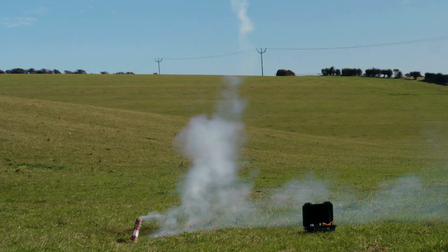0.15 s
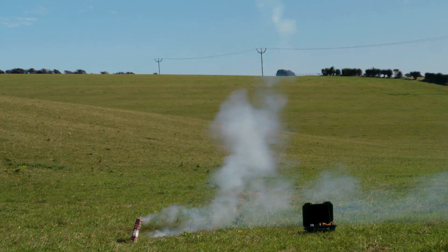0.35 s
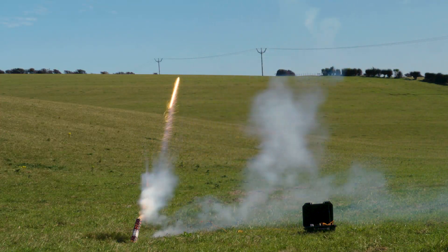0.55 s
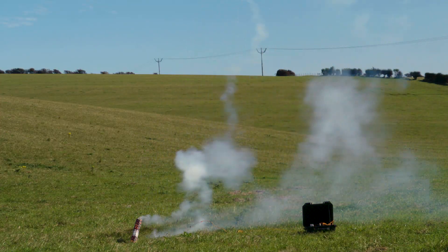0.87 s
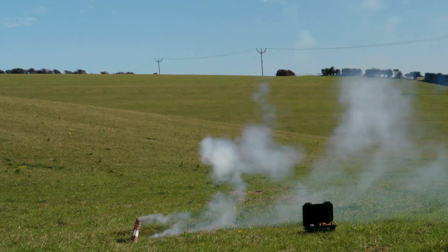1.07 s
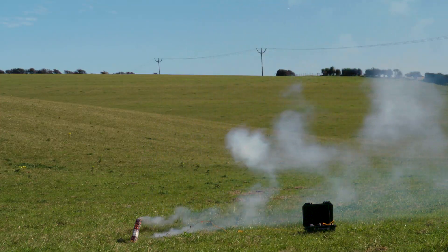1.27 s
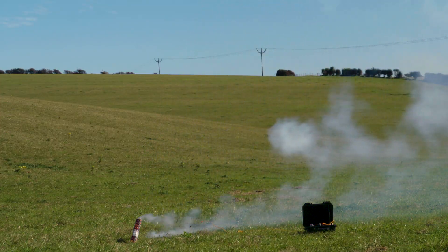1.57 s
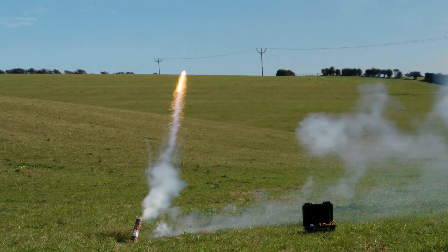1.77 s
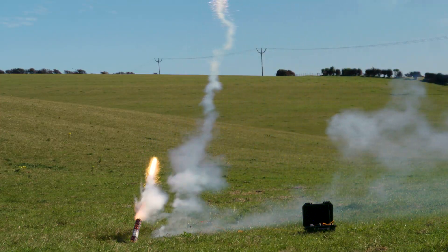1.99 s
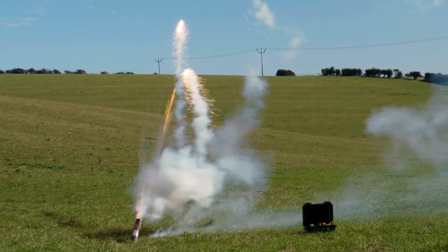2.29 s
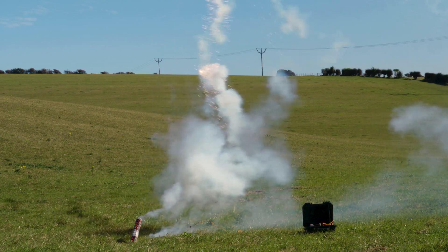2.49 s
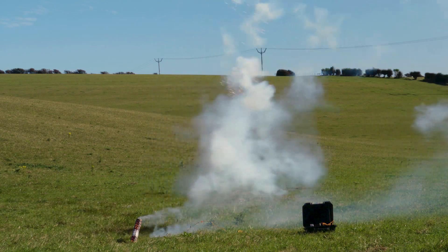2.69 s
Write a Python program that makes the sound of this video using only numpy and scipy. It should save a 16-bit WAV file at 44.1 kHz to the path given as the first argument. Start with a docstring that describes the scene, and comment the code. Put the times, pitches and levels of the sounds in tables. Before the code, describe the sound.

Firework tube fires five sharp cracking shots at uneven intervals in a windy open field

```python
"""Low puffs and rumble of wind on a microphone in an open field, over a faint hiss and murmur;
a dying sizzle opens the scene, then a firework tube fires five shots. Each is a crack and a thump
with a ground echo, a short sizzle, and two later washes of hiss thrown back from far off.
Cracks are pressure spikes and crackling noise, thumps are ringing tube modes,
puffs are short swung cosines; sizzle, washes, rumble and floor are shaped noise."""
import sys
import numpy as np
from scipy import signal
from scipy.fft import rfft, irfft
from scipy.io import wavfile

SR = 44100
rng = np.random.default_rng(int(sys.argv[2]) if len(sys.argv) > 2 else 0)


def volts(x):
    """Linear amplitude factor 10**(x/20) for a level x in dB, scalar or array-like."""
    e = np.asarray(x, float) / 20
    return 10 ** e


def wav_record(signal):
    """Record a signal, one row per channel, as 16-bit PCM in the file named by sys.argv[1]."""
    frames = np.transpose(np.atleast_2d(signal))
    bounded = np.clip(frames, -1, 1)
    # unit amplitude maps onto the largest positive 16-bit level
    quanta = np.round(bounded * 32767).astype(np.int16)
    wavfile.write(sys.argv[1], SR, quanta)


N = 125685
TIME = np.arange(N) / SR

# shots of the tube: (time [s], sizzle level [dB], sizzle t60 [s], sizzle treble boost [dB],
# near wash level [dB], far wash level [dB], jet pitch [Hz], ground echo level [dB], gas leak time [s])
SHOTS = [(-.03, -34, 0.32, 8, -36.5, -46.5, 4870, -14, .006),
         (0.5947, -23, 0.091, 3.5, -43.5, -50.5, 4600, -8, 0.0093),
         (1.7774, -21, 0.093, 2, -47, -46.5, 8600, -5, 0.015),
         (2.0238, -33, 0.15, -21, -60, -46, 8300, -4.5, 0.0066),
         (2.2017, -23, 0.063, 5.5, -50.5, -57, 7860, -7, 0.014),
         (2.361, -21, 0.088, 3.5, -37, -49, 6900, -4.5, 0.013)]
RISE_S = 0.0004  # onset of sizzle and crackle
TREBLE_HZ, TREBLE_T60_SHARE = 5500, 0.72  # the treble dies sooner


def rms_one(x):
    """Scale to rms 1."""
    return x / np.sqrt(np.mean(x ** 2) + 1e-20)


def cut(x, hz, kind, order):
    """Butterworth high- or low-pass."""
    return signal.sosfilt(signal.butter(order, hz, kind, fs=SR, output="sos"), x)


def coloured(spectrum):
    """Noise with the given spectrum, interpolated over log frequency; rms 1."""
    hz, level_db = np.transpose(spectrum)
    bin_hz = np.maximum(np.arange(N // 2 + 1) * SR / N, 1)
    gain = volts(np.interp(np.log(bin_hz), np.log(hz), level_db))
    return rms_one(irfft(rfft(rng.standard_normal(N)) * gain, N))


def halves(spectrum):
    """Coloured noise split into body and treble."""
    noise = coloured(spectrum)
    body = cut(noise, TREBLE_HZ, "low", order=2)
    treble = -cut(noise, TREBLE_HZ, "high", order=2)  # the sign keeps the crossover from cancelling
    return body, treble


def drift(rate):
    """Slow random wander below about the given rate in Hz; rms 1."""
    r = np.exp(-2 * np.pi * rate / SR)
    settling = 4000  # samples dropped while the filter settles
    wander = signal.lfilter([1], [1, -2 * r, r * r], rng.standard_normal(N + settling))
    return rms_one(wander[settling:])


def ring(x, hz, t60):
    """A damped resonator: a unit click sets a sine of about height 1 ringing."""
    r, w = volts(-60 / (t60 * SR)), 2 * np.pi * hz / SR
    return signal.lfilter([0, np.sin(w)], [1, -2 * r * np.cos(w), r * r], x + 1e-18)


def swell(start, rise, hold, t60):
    """Envelope that rises in a line, holds, then dies away exponentially."""
    t = TIME - start
    fall_db = -60 * np.maximum(t - rise - hold, 0) / t60
    return np.clip(t / rise, 0, 1) * volts(fall_db)


def ground(x):
    """The ground repeats each shot after a short delay, with a strength of its own."""
    delay_s = 0.0105
    starts = [shot[0] - shot[8] for shot in SHOTS]  # from the start of each gas leak
    strengths = volts([shot[7] for shot in SHOTS])
    strength = strengths[np.searchsorted(starts, TIME) - 1]
    return np.roll(x * strength, int(delay_s * SR))


def jet(level, s):
    """The jet of gas favours one band: noise around the jet pitch of the shot nearest to time s."""
    t60_s = 0.0025  # damping of the two resonators in series, the first twice as fast
    hz = min(SHOTS, key=lambda shot: abs(shot[0] - s))[6]
    noise = ring(rng.standard_normal(N), hz, t60_s / 2)
    return level * rms_one(ring(noise, hz, t60_s))


def background():
    """Steady coloured noise: a faint hiss and a low far-off murmur."""
    # spectrum of the hiss: (frequency [Hz], relative level [dB per Hz])
    hiss_spectrum = [(760, -34), (1300, -3), (1730, 7.5), (2000, 5.5), (2490, 1.5), (4220, -5.5), (4630, 4),
                     (5600, -13.5), (6550, -2), (8000, -5.5), (16000, -41)]
    # spectrum of the low far-off noise: (frequency [Hz], relative level [dB per Hz])
    murmur_spectrum = [(20, 4), (100, 1), (400, -24), (760, -8), (1300, -18), (2500, -54)]
    hiss_db, murmur_db = -62, -55
    return volts(hiss_db) * coloured(hiss_spectrum) + volts(murmur_db) * coloured(murmur_spectrum)


def wind():
    """Lumpy rumble on the gust curve, and single puffs that swing a cycle or two, with a sharper edge."""
    # rumble of the wind as it gusts: (time [s], level [dB])
    gusts = [(0, -55.5), (0.12, -46), (0.25, -48.5), (0.33, -45), (0.42, -39.5), (0.5, -67.5),
             (0.55, -27.5), (0.64, -39.5), (0.76, -37), (0.8, -42), (0.83, -30.5), (0.95, -36.5),
             (1.04, -56), (1.08, -25), (1.14, -33), (1.3, -32), (1.38, -43.5), (1.5, -34), (1.56, -19),
             (1.67, -40), (1.74, -62.5), (1.76, -32), (1.84, -38.5), (1.87, -21.5), (1.96, -32.5),
             (2.05, -33), (2.13, -37.5), (2.17, -28.5), (2.27, -31.5), (2.33, -40.5), (2.42, -47),
             (2.5, -40), (2.57, -57.5), (2.66, -65.5), (2.742, -56), (2.755, -27), (2.85, -28)]
    # spectrum of the rumble: (frequency [Hz], relative level [dB per Hz])
    rumble_spectrum = [(12, -54), (40, -12), (120, 1), (240, 2.5), (400, -9), (600, -18.5), (900, -38.5),
                       (2000, -79)]
    # puffs on the microphone: (time [s], peak of envelope [dB], pitch [Hz], edge level [dB])
    puffs = [(0.257, -25.5, 183, -50), (0.323, -18.5, 259, -38), (0.356, -25, 165, -26),
             (0.568, -14.5, 324, -24), (0.584, -12.5, 242, -19), (0.671, -14, 354, -19),
             (0.678, -16, 238, -46), (0.752, -18, 231, -24), (0.822, -12, 292, -26),
             (0.847, -20, 300, -23.5), (0.909, -4.5, 265, -27), (0.999, -21.5, 210, -33),
             (1.08, -18, 303, -40), (1.096, -13.5, 369, -34), (1.117, -13.5, 250, -57),
             (1.155, -15, 258, -33), (1.225, -18.5, 310, -28), (1.247, -12, 232, -27),
             (1.266, -20, 280, -23.5), (1.524, -18.5, 318, -13.5), (1.534, -12, 244, -36),
             (1.551, -12, 235, -44), (1.56, -18.5, 247, -11), (1.59, -25, 253, -22),
             (1.658, -21.5, 244, -37), (1.866, -10.5, 308, -19), (1.886, -21, 248, -27),
             (1.902, -12.5, 183, -25), (1.943, -19, 308, -19.5), (2.081, -3, 295, -22),
             (2.102, -15.5, 190, -25), (2.17, -19, 265, -27), (2.235, -23, 229, -22),
             (2.251, -11, 254, -43), (2.264, -15.5, 338, -28), (2.291, -19, 318, -28),
             (2.763, -17, 253, -45), (2.772, -17.5, 227, -41), (2.803, -18.5, 290, -44),
             (2.837, -19, 262, -21.5)]
    lumps_db, lumps_hz = 5, 55
    bass_hz, bass_follows = 147, 0.34  # the deepest rumble follows only part of the gust
    rise_cycles, fall_cycles = 0.41, 0.48  # Gaussian spreads of a puff
    edge_hz, edge_s = 360, 0.00056

    gust_db = np.interp(TIME, *np.transpose(gusts)) + lumps_db * drift(lumps_hz)
    bass_db = gust_db.mean() + bass_follows * (gust_db - gust_db.mean())
    noise = coloured(rumble_spectrum)
    out = volts(gust_db) * cut(noise, bass_hz, "high", order=2)
    out -= volts(bass_db) * cut(noise, bass_hz, "low", order=2)  # minus keeps the crossover from cancelling

    phases = rng.random((len(puffs), 2))  # in turns
    for (s, peak_db, hz, edge_db), (puff_turn, edge_turn) in zip(puffs, phases):
        span = slice(int((s - 0.03) * SR), int((s + 0.04) * SR))
        t = TIME[span] - s
        width = np.where(t < 0, rise_cycles, fall_cycles) / hz
        puff = np.exp(-0.5 * (t / width) ** 2) * np.cos(2 * np.pi * (hz * t + puff_turn))
        edge = np.exp(-0.5 * (t / edge_s) ** 2) * np.cos(2 * np.pi * (edge_hz * t + edge_turn))
        out[span] += volts(peak_db) * puff + volts(edge_db) * edge
    return out


def sizzle():
    """Burning gas leaks, then sputters out of the tube and dies fast; the ground repeats its noise."""
    # spectrum of the burning gas: (frequency [Hz], relative level [dB per Hz])
    gas_spectrum = [(240, -23.5), (400, 4), (1060, -8.5), (1400, -3), (3070, -8.5), (7400, -16),
                    (13300, -35.5), (16000, -78)]
    leak_db, jet_db = -12, -12  # both relative to the sizzle
    sputter_db, sputter_hz = 2, 500

    out = np.zeros(N)
    for s, sizzle_db, t60, *_ in SHOTS:
        out += jet(volts(sizzle_db + jet_db) * swell(s, RISE_S, 0, t60), s)
    body, treble = halves(gas_spectrum)
    for noise, boosted, t60_share in ((body, 0, 1), (treble, 1, TREBLE_T60_SHARE)):
        level = np.zeros(N)
        for s, sizzle_db, t60, treble_db, *_, leak_s in SHOTS:
            burn = swell(s, RISE_S, 0, t60 * t60_share)
            leak = volts(leak_db) * swell(s - leak_s, leak_s, 0, leak_s)  # gas leaks just before the shot
            level += volts(sizzle_db + boosted * treble_db) * (burn + leak)
        out += noise * (level + ground(level))
    return out * volts(sputter_db * drift(sputter_hz))


def washes():
    """Each shot comes back twice as hiss that flickers band by band, the second duller and longer."""
    # spectrum of the first wash: (frequency [Hz], relative level [dB per Hz])
    near_spectrum = [(290, -26), (500, -7), (819, 1), (2500, -1), (4100, -4), (7310, -9), (11800, -29.5),
                     (16000, -64)]
    # spectrum of the second wash: (frequency [Hz], relative level [dB per Hz])
    far_spectrum = [(290, -21.5), (500, 8.5), (2520, -0.5), (3420, -7.5), (8130, -17.5), (14000, -44.5)]
    near_delay_s, near_rise_s, near_hold_s, near_t60_s = 0.056, 0.011, 0.074, 0.29
    far_delay_s, far_rise_s, far_hold_s, far_t60_s = 0.22, 0.0028, 0.0062, 0.98
    grain_db, grain_hz = 3, 75
    shared_part = 0.21  # of the flicker common to all bands, added to each band's own
    band_edges_hz = np.geomspace(700, 8000, 10)

    far_level = sum(volts(shot[5]) * swell(shot[0] + far_delay_s, far_rise_s, far_hold_s, far_t60_s)
                    for shot in SHOTS)
    out = coloured(far_spectrum) * far_level
    for noise, share in zip(halves(near_spectrum), (1, TREBLE_T60_SHARE)):
        hold_s, t60_s = near_hold_s * share, near_t60_s * share
        near_level = sum(volts(shot[4]) * swell(shot[0] + near_delay_s, near_rise_s, hold_s, t60_s)
                         for shot in SHOTS)
        out = out + noise * near_level

    # neighbouring low-passes differ by one band
    lows = [0] + [cut(out, hz, "low", order=2) for hz in band_edges_hz] + [out]
    shared = drift(grain_hz)
    flickering = np.zeros(N)
    for below, above in zip(lows, lows[1:]):
        flicker_db = grain_db * (shared_part * shared + drift(grain_hz))
        flickering += (above - below) * volts(flicker_db)
    return flickering


def blasts():
    """A narrow pressure spike and crackle, then the tube rings; the ground echo is thinner and duller."""
    # pressure blasts from the tube: (time [s], spike peak [dB], spike width [ms], thump level [dB],
    # overtones relative to thump [dB], crackle level [dB])
    blast_list = [(0.5943, 0, 0.12, -6.5, -11, -16.5), (0.5971, 3, 0.24, 0.5, -9.5, -16),
                  (1.7765, -5.5, 0.04, -18.5, 4.5, -24.5), (1.7829, -1, .4, 2, -13, -23.5),
                  (2.026, -7, 0.22, -16.5, 5, -36.5), (2.0312, -13, 0.15, -12.5, -6.5, -40.5),
                  (2.2001, 0.5, 0.098, -5.5, 4.5, -21), (2.2034, -2.5, 0.37, -2.5, -1.5, -39),
                  (2.3594, 7, 0.21, -30, -9, -17.5), (2.3624, -5.5, 0.36, -1, 2, -16.5)]
    # modes of the tube, the thump first, then overtones: (frequency [Hz], level [dB], t60 [s])
    tube_modes = [(265, -0.5, 0.018), (818, -5.5, .018), (1340, -21.5, 0.014)]
    thump_lag_s = 0.00045
    crackle_t60_s, crackle_low_hz, crackle_top_hz = 0.014, 1500, 8000
    jet_db = 2  # relative to the crackle
    knock_top_hz, blast_low_hz = 5560, 112
    ground_low_hz, ground_top_hz = 380, 7700

    spike, thump_clicks, overtone_clicks, crackle = np.zeros((4, N))
    broad = cut(rng.standard_normal(N), crackle_low_hz, "high", order=2)
    broad = rms_one(cut(broad, crackle_top_hz, "low", order=4))
    for s, peak_db, width_ms, thump_db, over_db, crackle_db in blast_list:
        spread_s = width_ms / 2000  # half the width
        spike -= volts(peak_db) * np.exp(-0.5 * ((TIME - s) / spread_s) ** 2)
        click = int((s + thump_lag_s) * SR)
        thump_clicks[click] = volts(thump_db)
        overtone_clicks[click] = volts(thump_db + over_db)
        level = volts(crackle_db) * swell(s, RISE_S, 0, crackle_t60_s)
        crackle += level * broad + jet(volts(jet_db) * level, s)

    rings = np.zeros(N)
    for k, (hz, mode_db, t60) in enumerate(tube_modes):
        clicks = thump_clicks if k == 0 else overtone_clicks
        rings += volts(mode_db) * ring(clicks, hz, t60)
    knock = cut(rings, knock_top_hz, "low", order=2)
    direct = cut(spike + crackle + knock, blast_low_hz, "high", order=2)
    thinner = cut(direct, ground_low_hz, "high", order=1)
    duller = cut(thinner, ground_top_hz, "low", order=2)
    return direct + ground(duller)


def scene():
    """All sources, mono."""
    return (background() + wind() + sizzle() + washes() + blasts())[None]


def band_limit(x):
    """A steep low-pass at the top of the band."""
    return signal.sosfilt(signal.butter(12, 16150, fs=SR, output="sos"), x)


def record(dry):
    """The microphone cuts the deep bass; the loudest spikes overload."""
    thinned = cut(dry, 62, "high", order=3)  # Hz
    mix = np.clip(thinned, -1.0, 1.0)
    return band_limit(mix)


dry = scene()
out = record(dry)
wav_record(out)
```